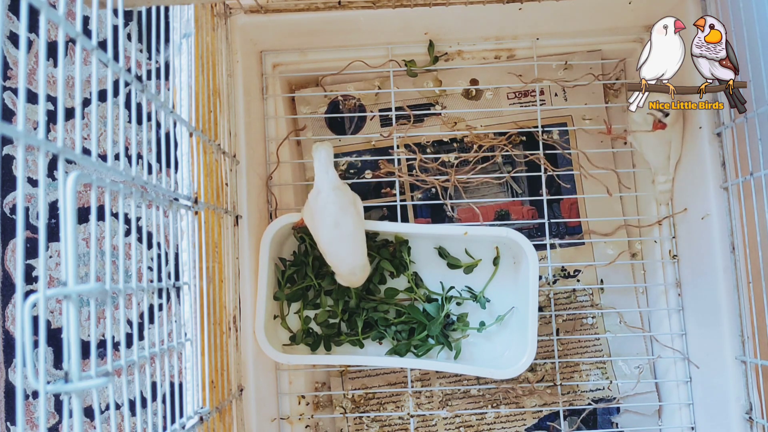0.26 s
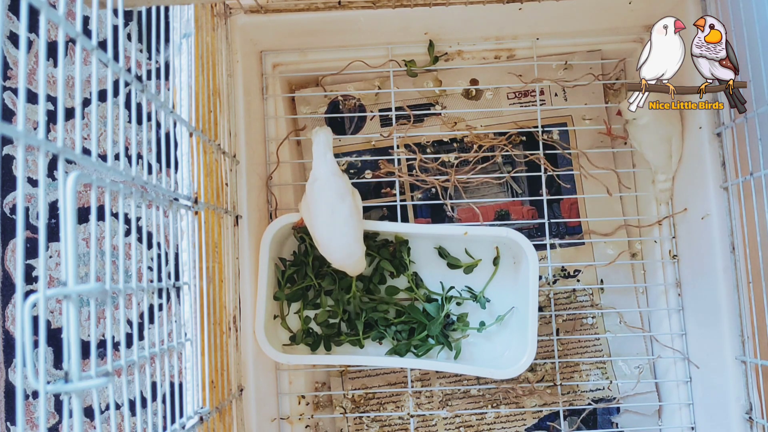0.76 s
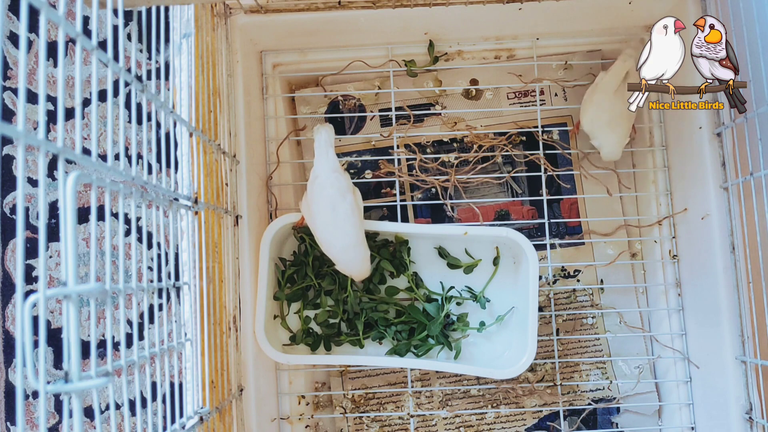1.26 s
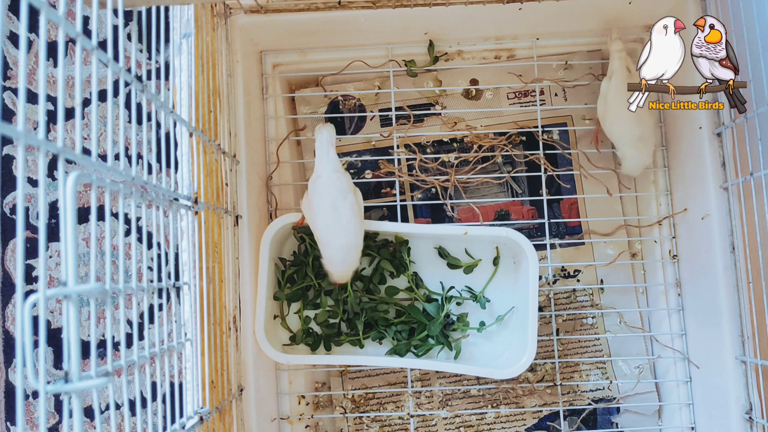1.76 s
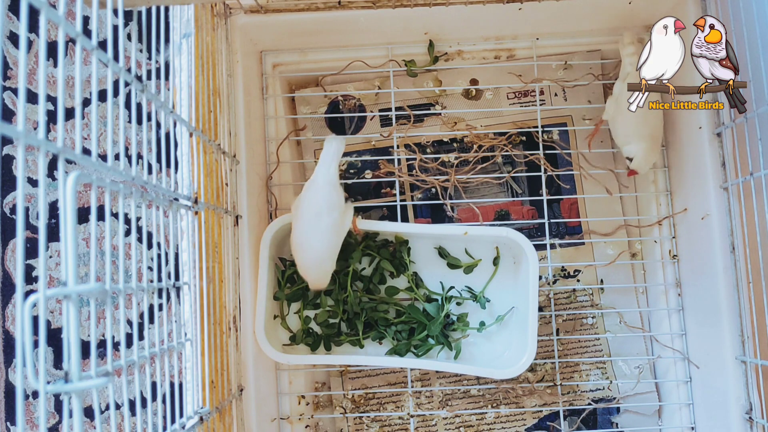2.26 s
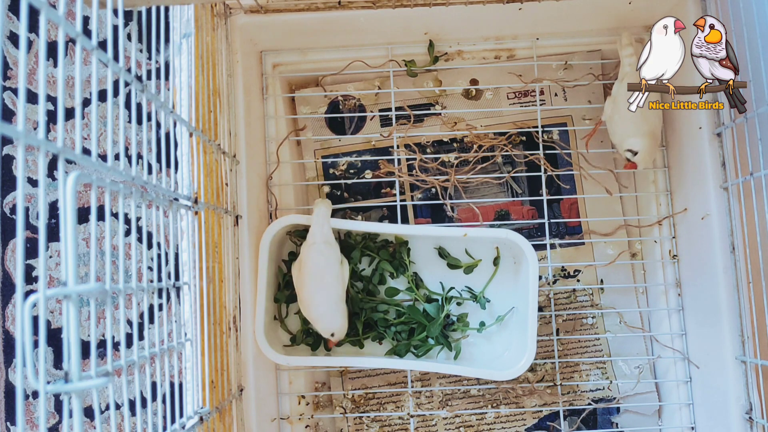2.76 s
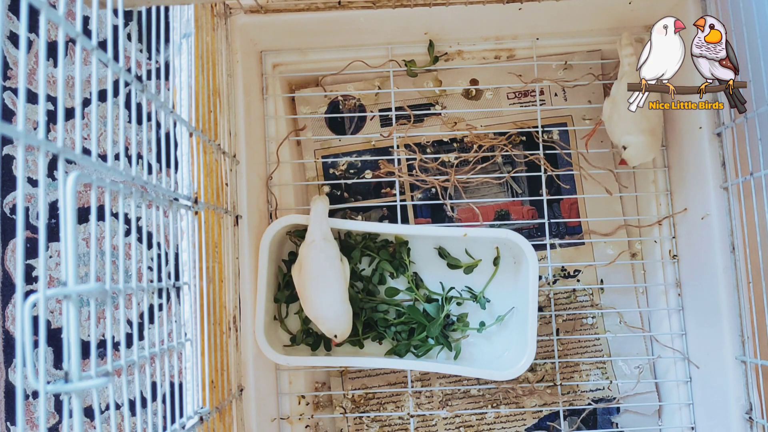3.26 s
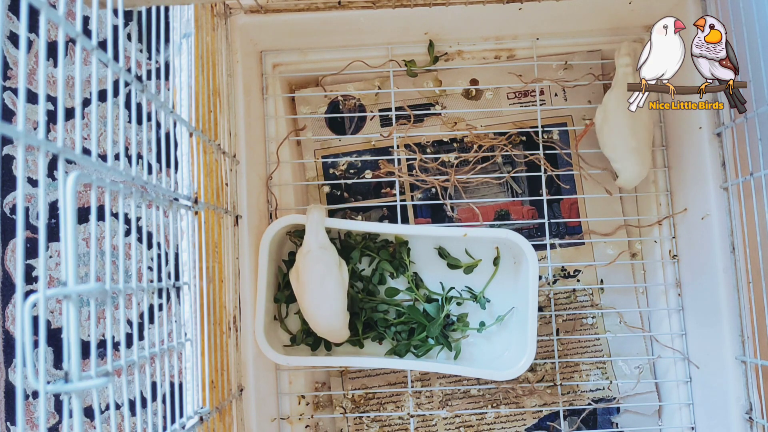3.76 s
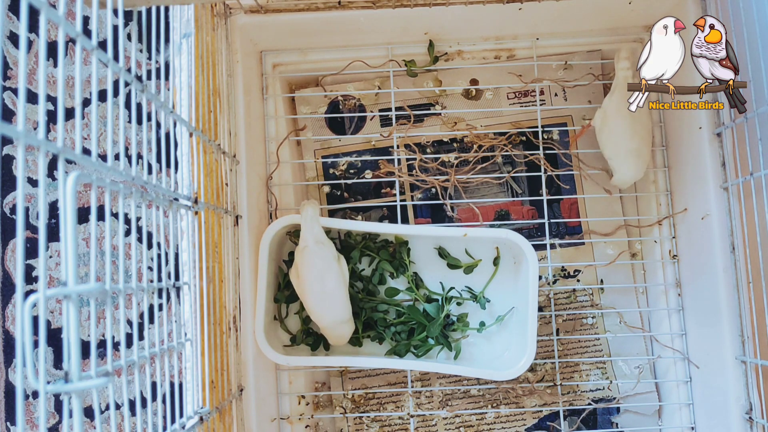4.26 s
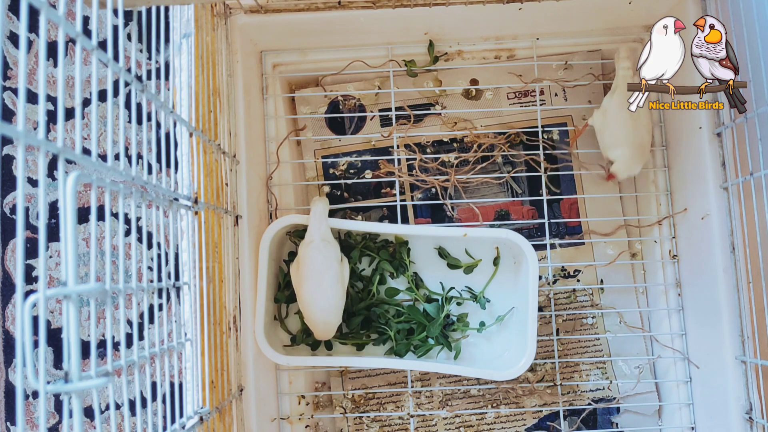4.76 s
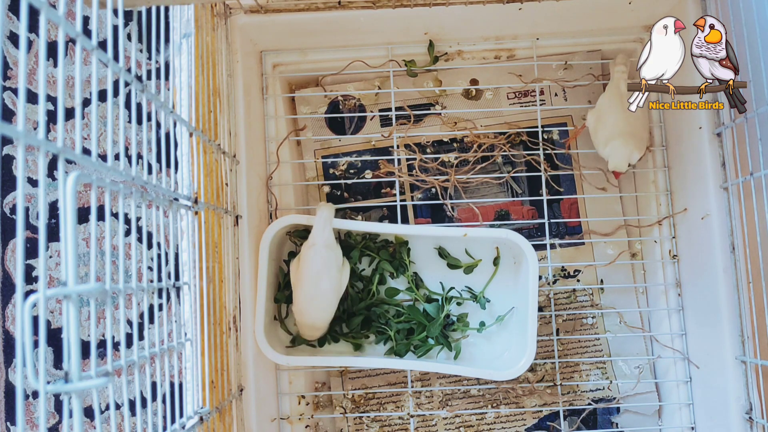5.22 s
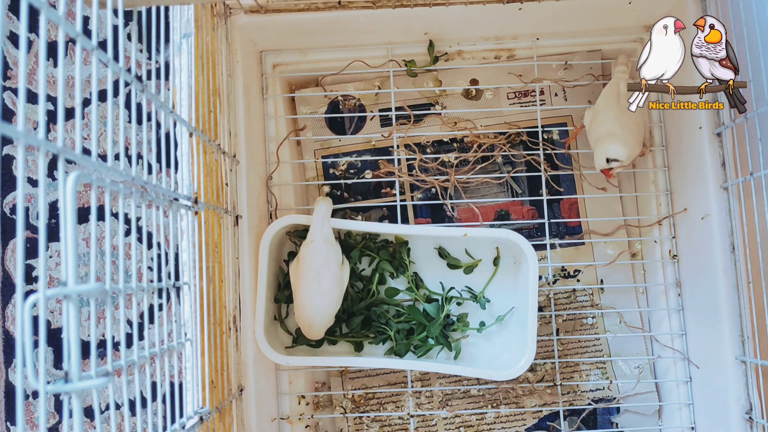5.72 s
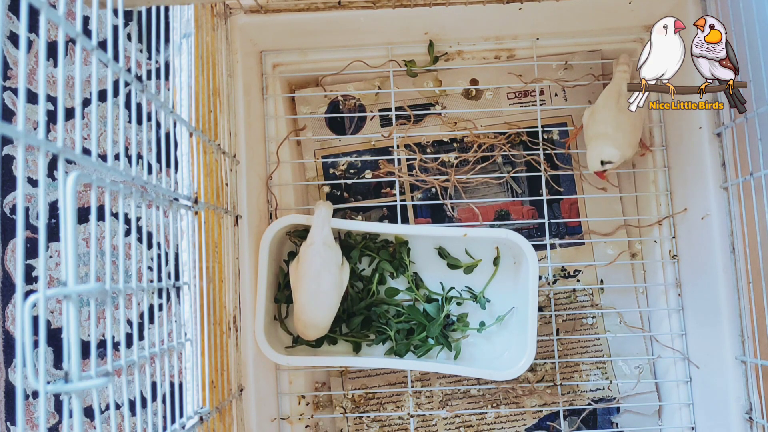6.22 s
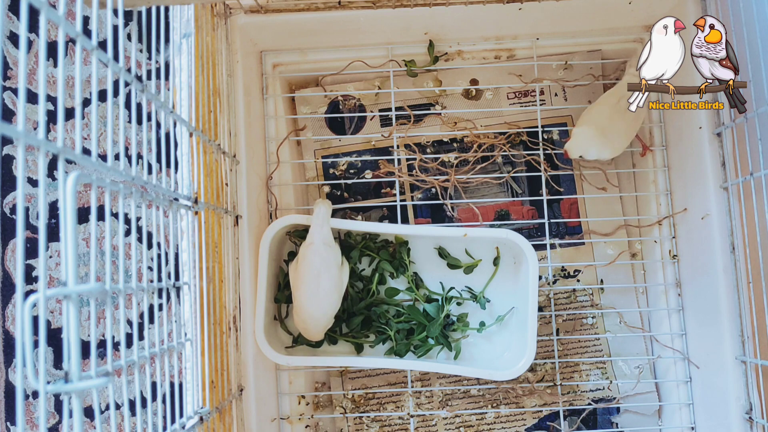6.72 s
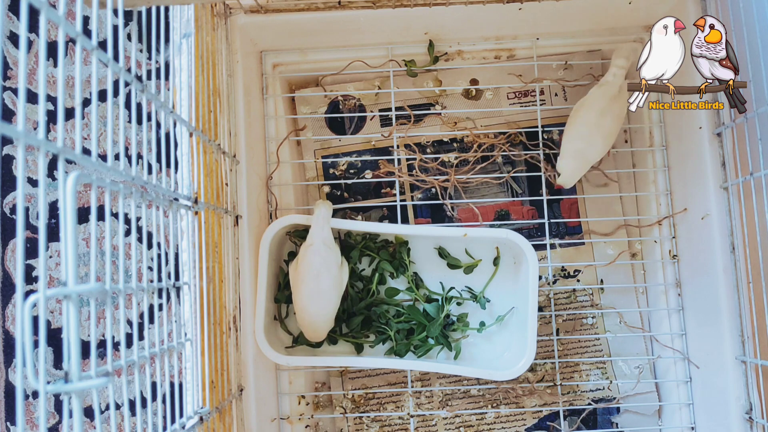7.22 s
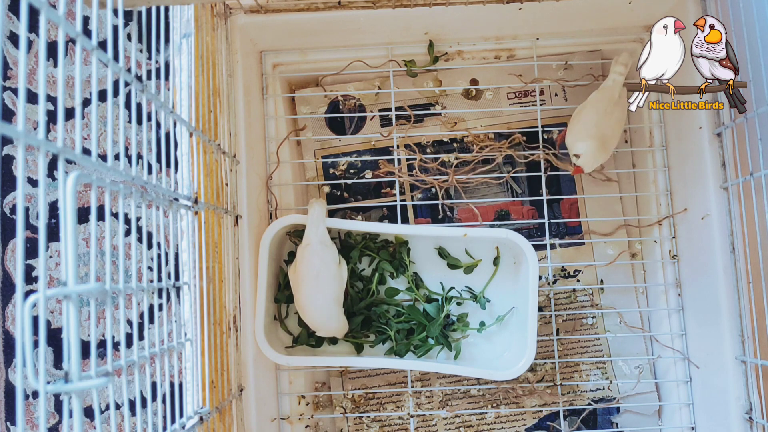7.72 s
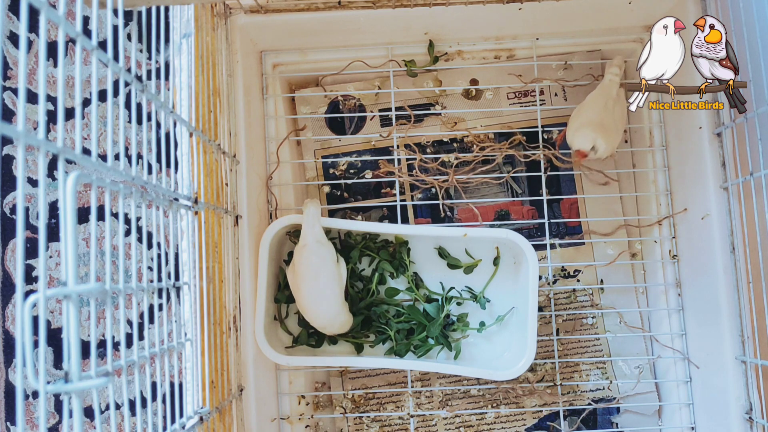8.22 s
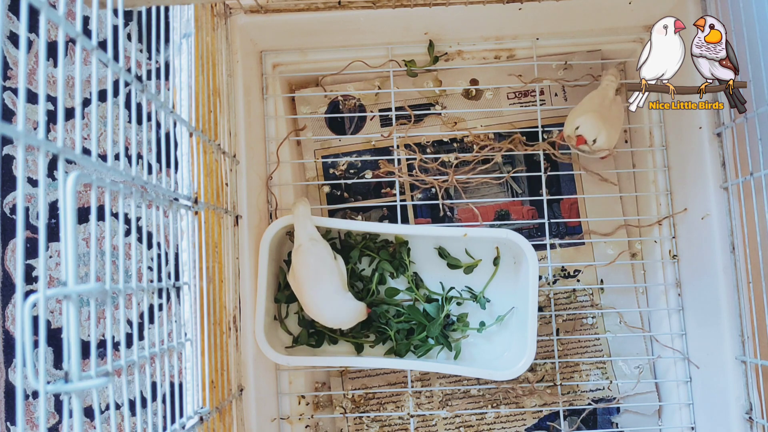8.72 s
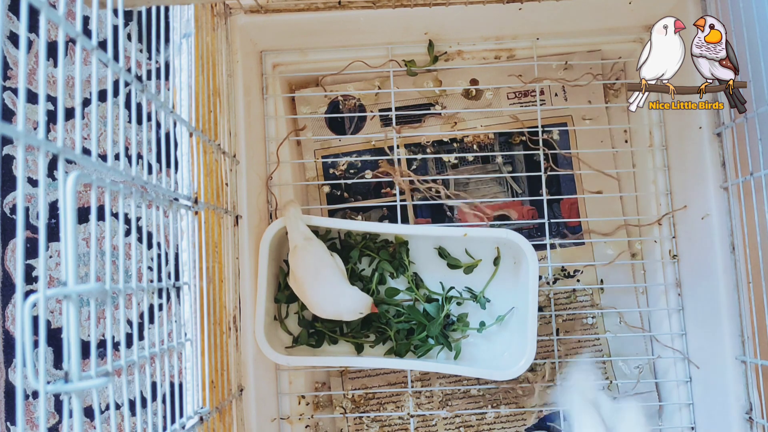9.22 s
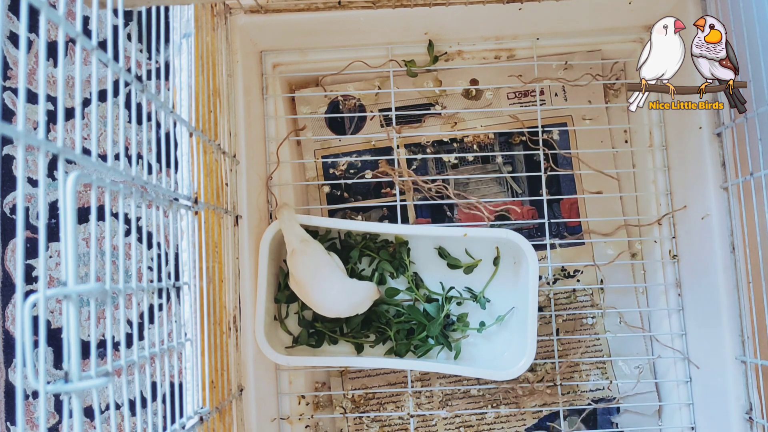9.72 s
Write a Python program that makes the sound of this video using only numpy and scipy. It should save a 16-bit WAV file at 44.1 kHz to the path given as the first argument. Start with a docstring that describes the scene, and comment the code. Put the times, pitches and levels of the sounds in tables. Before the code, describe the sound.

Two small finches move about an indoor wire cage, heard from close by over a low room hum. Brief nasal song with thin whistled pips and soft answering beeps opens and closes the scene. In between, light pecks and hops sound on a tray, broken by two bursts of piercing, upward chirps, the loudest sounds. Wings whirr briefly early on and twice at the end, when the wire clicks and rings faintly.

```python
"""Small room, just above a wire-fronted breeding box of zebra finches. One sings a short phrase four
times: nasal notes, two pure pips, a run of harsh downsweeps. Another answers with soft tets. Notes,
sweeps and tets are syrinx harmonics shaped by the throat; loud rising calls, in two bursts, use both
sides of the syrinx at once. Beaks and feet ring the tray and tick on wire, wings whirr, the room hums."""
import sys
import numpy as np
from scipy import signal
from scipy.fft import rfft, irfft, next_fast_len
from scipy.io import wavfile

SR = 44100
rng = np.random.default_rng(int(sys.argv[2]) if len(sys.argv) > 2 else 0)


def inscribe(sig):
    """Save sig as 16-bit PCM at rate SR to the path in sys.argv[1].

    A 1-D sig is mono; a 2-D sig holds one channel per row.
    Samples are clipped to [-1, 1] before scaling.
    """
    pcm = np.round(np.clip(np.atleast_2d(sig).T, -1, 1) * 32767)
    wavfile.write(sys.argv[1], SR, pcm.astype(np.int16))


N = 440109
TIME_S = np.arange(N) / SR
EDGE_HZ = 15950

# nasal song notes (time [s], length [s], start pitch [Hz], held pitch [Hz], level [dB], roughness [0-1])
NOTES = [(-.035, 0.058, 990, 1090, -24.5, 0.38), (.566, .067, 1344, 1082, -27.5, 0.6),
         (.738, 0.072, 993, 1101, -25, 0.28), (8.235, 0.076, 1012, 1136, -27, 0.28),
         (8.432, .08, 968, 1088, -25, 0.28), (9.081, 0.065, 1332, 1064, -28, 0.48),
         (9.402, 0.067, 987, 1097, -24, 0.25)]
# phrase endings (time [s], low pip [Hz], its level [dB], wait [s], high pip length [s],
# its pitch [Hz], its level [dB])
FLOURISHES = [(0.104, 4106, -27, 0.061, 0.016, 5410, -22), (0.973, 4040, -28, 0.059, 0.025, 5340, -21),
              (8.615, 4214, -28, .063, 0.0125, 5190, -19.5), (9.583, 4070, -26, 0.066, 0.01, 5230, -16.5)]
# downsweep run (delay from high pip onset [s], length [s], from [Hz], to [Hz], level [dB])
SWEEP_RUN = [(0.036, 0.036, 1736, 1180, -37.5), (0.076, .068, 1192, 820, -37.5),
             (0.183, .028, 1860, 1310, -34.5), (0.205, 0.055, 1350, 937, -45)]
# answering calls (time [s], length [s], pitch [Hz], level [dB], roughness [0-1])
TETS = [(0.446, 0.079, 527, -37.5, 0.22), (2.158, .039, 553, -40.5, 0.42), (8.074, 0.096, 629.6, -37, 0.14),
        (8.647, 0.07, 609, -34, 0.1), (8.969, .068, 522, -37.5, 0.2), (9.044, .035, 563, -36, 0.2),
        (9.267, 0.093, 622, -34, 0.13), (9.566, .036, 564, -32, 0.22)]
# low falling calls (time [s], length [s], level [dB])
MURMURS = [(5.01, .052, -35.5), (7.842, 0.043, -36.5)]
# faint contact chips (time [s], level [dB])
CHIPS = [(2.687, -46), (3.815, -50.5), (6.159, -50), (6.48, -54.5), (7.334, -45.5)]
# throat response per call type (frequency [Hz], gain [dB])
NOTE_THROAT = [(500, -16), (1050, -9), (1600, -6), (2200, -4.5), (3300, 3), (4300, 3), (5400, 5),
               (6500, -6.5), (8400, -5.5), (10500, -21.5), (13000, -24), (16000, -16)]
SWEEP_THROAT = [(600, -4), (1500, -6), (2900, 1.5), (4200, 4.5), (5600, 2.5), (7000, -3.5), (8600, -11),
                (10500, -27), (16000, -21)]
TET_THROAT = [(550, -19), (1150, -6), (1800, -9), (2500, -2), (3200, -3.5), (4300, -2.5), (5500, -12),
              (7000, -20.5), (8500, -13), (10500, -41), (16000, -30)]
CHIP_THROAT = [(1400, -16.5), (2900, 5), (4300, -7.5), (6000, -5.5), (9000, -10.5), (16000, -32)]
# loud rising calls (time [s], length [s], pitch at foot of climb [Hz], level [dB])
CRIES = [(3.138, 0.077, 5180, -14), (3.282, 0.057, 5220, -13), (6.698, 0.069, 5130, -12.5),
         (6.827, 0.066, 5120, -11.5), (6.962, 0.063, 4910, -11)]
# their partials (low voice multiple, high voice multiple)
CRY_PARTIALS = [(0, 1), (1, 0), (2, 0), (1, 1), (0, 2), (-1, 1), (-1, 2)]
# per partial (level [dB])
CRY_PARTIALS_DB = [-13, -17.5, -29, -30, -30, -44.5, -24.5]

# short flights and winged hops (time [s], length [s], swish [dB], draught [dB])
FLIGHTS = [(1.084, 0.15, -40.5, -60), (1.435, 0.12, -50, -40), (9.052, 0.14, -39, -36.5),
           (9.813, 0.14, -40.5, -35)]
# claws and beaks on wire (time [s], level [dB])
TICKS = [(1.1206, -33), (1.232, -46), (1.896, -32), (2.052, -38), (3.999, -34.5), (4.741, -35),
         (5.167, -35.5), (5.371, -38.5), (5.931, -42.5), (7.5713, -32.5), (9.0658, -21.5), (9.218, -28),
         (9.866, -20.5), (9.8795, -19.5)]
# pecks and hops on tray and floor (time [s], blow [dB], scuff [dB], centre [Hz])
KNOCKS = [(1.145, -33, -49, 836), (1.231, -31, -40.5, 1074), (1.809, -38, -40, 667),
          (1.901, -32, -40.5, 1120), (2.053, -37, -40, 730), (2.411, -21, -38, 1150),
          (2.425, -32, -51, 1190), (2.44, -25.5, -54, 1190), (2.606, -32, -42, 1020),
          (2.615, -23.5, -65, 1110), (3.696, -34, -37, 1900), (4.247, -45, -60, 1200),
          (4.395, -42, -57, 1100), (4.432, -44, -59, 1080), (4.741, -39, -35, 576),
          (5.228, -48, -52.5, 1600), (5.3, -38, -56, 1580), (6.947, -39, -44, 1040),
          (7.081, -35, -31, 1210), (9.882, -24.5, -61, 760)]
# tray and cage wire modes (frequency [Hz], level [dB], t60 [s])
TRAY_MODES = [(537, -9, 0.063), (782, -6, 0.024), (1005, 0, 0.017), (1153, 0.5, 0.011), (1260, -3.5, 0.034),
              (1514, -0.5, 0.015), (1736, -5, 0.018), (3070, -10.5, 0.021)]
WIRE_MODES = [(2015, -35.5, 0.73), (2173, -38.5, 0.43), (1226, -36, 0.18)]
# noise spectra of feathers, ticks and room air (frequency [Hz], relative level [dB])
FEATHER_SPECTRUM = [(100, 11.5), (250, 4.5), (600, 3.5), (1200, -4.5), (2200, -11), (4500, -10.5),
                    (8500, -7.5), (11000, -22), (16000, -10)]
TICK_SPECTRUM = [(500, -7), (2000, -3.5), (4500, -2.5), (7500, -4), (9000, -3.5), (11000, -27.5),
                 (16000, -8)]
AIR_SPECTRUM = [(12, -27), (20, 4.5), (70, -9.5), (141, -11), (203, -13), (227, -14.5), (496, -15),
                (620, -18.5), (713, -19), (1430, -29.5), (2720, -33.5), (4370, -37), (8310, -40.5),
                (10100, -49), (15800, -38.5)]

# room hum (frequency [Hz], level [dB])
HUM = [(101, -63), (145.3, -64.5), (199.2, -62)]
# left-right likeness of room noise (frequency [Hz], coherence [0-1])
AIR_COHERENCE = [(180, 0.41), (550, 0.53), (1650, 0.083), (4970, 0.02)]
# near-wall reflections (delay [ms], relative gain)
WALLS = [(4.1, .15), (7.2, .2), (10.5, .3), (13, .3), (17, .25), (21, .25), (28, .2)]
# room decay (frequency [Hz], t60 [s])
ROOM_DECAY = [(200, 0.15), (1200, 0.75), (3000, 0.45), (6000, 0.34), (9000, 0.4), (15000, 0.27)]
# duller right side (frequency [Hz], gain [dB])
RIGHT_SHADE = [(500, -0.5), (5000, -1), (8000, -2), (12000, -6)]


def amp(db):
    """dB to gain."""
    return 10 ** (np.asarray(db) / 20)


def unit_rms(x):
    """Scale to rms 1."""
    return x / np.sqrt(np.mean(x ** 2) + 1e-20)


def curve_at(points, hz):
    """Interpolate over log frequency."""
    points_hz, values = np.transpose(points)
    return np.interp(np.log(hz + 1), np.log(points_hz + 1), values)


def add(mix, at_s, sound):
    """Mix in at at_s, cropped to fit."""
    start = round(at_s * SR)
    sound = sound[max(-start, 0):]
    part = mix[max(start, 0):][:len(sound)]
    part += sound[:len(part)]


def equalise(x, spectrum):
    """Filter by (frequency [Hz], gain [dB]) points."""
    size = next_fast_len(len(x), real=True)
    gain = amp(curve_at(spectrum, np.fft.rfftfreq(size, 1 / SR)))
    return irfft(rfft(x, size) * gain, size)[:len(x)]


def noise(spectrum):
    """Scene-long shaped noise, rms 1."""
    return unit_rms(equalise(rng.standard_normal(N), spectrum))


def waver(t, rate_hz):
    """Random line, rms near 1, rate_hz knots a second."""
    knots = rng.standard_normal(4096)
    return np.interp(t * rate_hz, np.arange(len(knots)), knots)


def ramp(t, span_s):
    """0 to 1 over span_s, then held."""
    return np.clip(t / span_s, 0, 1)


def gate(t, attack_s, release_s):
    """Linear attack, hold, release."""
    return ramp(t, attack_s) * ramp(t[-1] - t, release_s)


def syrinx(hz, throat, rough, jitter=0.067, uneven=0.93):
    """Harmonics through the throat; roughness adds jitter and half-pitch lines from uneven pulses."""
    t = np.arange(len(hz)) / SR
    cycles = np.cumsum(hz * (1 + jitter * rough * waver(t, 1475))) / SR
    multiples = np.arange(1, int(2 * EDGE_HZ / hz.min()) + 1)[:, None] / 2
    gains = amp(curve_at(throat, multiples * hz)) * (multiples * hz < SR / 2)
    gains *= np.where(multiples % 1 > 0, uneven * rough, 1)
    lag_cycles = rng.random(size=256)[:len(multiples), None]  # throat ringing spreads each pulse
    stack = (gains * np.sin(2 * np.pi * (multiples * cycles + lag_cycles))).sum(0)
    return unit_rms(stack * (1 + rough * waver(t, 900)))


def nasal_notes(settle_s=0.0088, swell_s=0.0091, fall_s=0.033, swell_db=6, ease_db=3):
    """Harmonic stacks slide onto a held pitch and swell, then drop off it, ending rough."""
    out = np.zeros(N)
    for at_s, length_s, start_hz, held_hz, db, rough in NOTES:
        t = np.arange(0, length_s, 1 / SR)
        fall = ramp(t - length_s + fall_s, fall_s)
        hz = (held_hz + (start_hz - held_hz) * np.exp(-t / settle_s)) * (1 - 0.37 * fall)
        voice = syrinx(hz, NOTE_THROAT, rough=rough + (0.37 - rough) * fall)
        effort_db = db - swell_db * (1 - ramp(t, swell_s)) - ease_db * fall
        add(out, at_s, amp(effort_db) * gate(t, attack_s=0.0034, release_s=0.0017) * voice)
    return out


def room_tone(air_db=-49):
    """Steady stereo air noise, partly coherent in the bass, plus wavering hum."""
    hz, coherence = np.transpose(AIR_COHERENCE)
    left, independent = noise(AIR_SPECTRUM), noise(AIR_SPECTRUM)
    right = equalise(left, np.c_[hz, 20 * np.log10(coherence)])
    right += equalise(independent, np.c_[hz, 10 * np.log10(1 - coherence ** 2)])
    hum = np.zeros(N)
    for hum_hz, db in HUM:
        tone = np.sin(2 * np.pi * hum_hz * TIME_S + 0.82 * waver(TIME_S, 7.5))
        hum += amp(db) * unit_rms(tone * (1 + 0.55 * waver(TIME_S, 6)))
    return np.array([left, right]) * amp(air_db) + hum


def pip(length_s, hz, climb_hz_per_s, flick, fade_s, attack_s, settle_s=0.0025, octave_db=-38):
    """Near-pure whistle: drops onto its pitch, climbs, flicks up as it fades."""
    t = np.arange(0, length_s + fade_s, 1 / SR)
    fade = ramp(t - length_s, fade_s)
    bend = 1 + 0.074 * np.exp(-t / settle_s) + flick * fade + 0.018 * waver(t, 1340)
    phase = 2 * np.pi * np.cumsum(hz * bend + climb_hz_per_s * t) / SR
    tone = unit_rms(np.sin(phase) + amp(octave_db) * np.sin(2 * phase))
    return ramp(t, attack_s) * (1 - fade) ** 4 * tone


def downsweep(length_s, from_hz, to_hz, throat, rough, attack_s, release_s=0.005):
    """Harmonic stack gliding steadily down."""
    t = np.arange(0, length_s, 1 / SR)
    return gate(t, attack_s, release_s) * syrinx(np.geomspace(from_hz, to_hz, len(t)), throat, rough)


def flourishes(low_length_s=0.014):
    """Phrase ending: low pip, high pip, run of harsh downsweeps."""
    pips, runs = np.zeros(N), np.zeros(N)
    for at_s, low_hz, low_db, wait_s, high_length_s, high_hz, high_db in FLOURISHES:
        low = pip(low_length_s, low_hz, climb_hz_per_s=1700, flick=0.033, fade_s=0.0034, attack_s=0.0023)
        high = pip(high_length_s, high_hz, climb_hz_per_s=13600, flick=0.52, fade_s=0.018,
                   attack_s=0.0022)
        add(pips, at_s, amp(low_db) * low)
        add(pips, at_s + wait_s, amp(high_db) * high)
        for delay_s, length_s, from_hz, to_hz, db in SWEEP_RUN:
            sweep = downsweep(length_s, from_hz, to_hz, SWEEP_THROAT, rough=0.75, attack_s=0.0059)
            add(runs, at_s + wait_s + delay_s, amp(db) * sweep)
    return pips, runs


def tets(scoop=0.22, settle_s=0.012, fall=0.092, fall_s=0.0293):
    """Soft, clear stacks; pitch and level form one low arch."""
    out = np.zeros(N)
    for at_s, length_s, held_hz, db, rough in TETS:
        t = np.arange(0, length_s, 1 / SR)
        hz = held_hz * (1 - scoop * np.exp(-t / settle_s) - fall * ramp(t - length_s + fall_s, fall_s))
        envelope = amp(db) * gate(t, attack_s=0.024, release_s=0.019)
        add(out, at_s, envelope * syrinx(hz, TET_THROAT, rough))
    return out


def wings(beat_hz=26, rise_s=0.045, lag_s=0.052, swish_fade_db_per_s=67, draught_fade_db_per_s=220):
    """Each downstroke swishes the feathers and pushes a puff of air; the draught arrives later."""
    swish_gain, draught_gain = np.zeros(N), np.zeros(N)
    t = np.arange(SR) / SR
    for at_s, length_s, swish_db, draught_db in FLIGHTS:
        landed_s = np.maximum(t - length_s, 0)
        add(swish_gain, at_s, ramp(t, rise_s) * amp(swish_db - swish_fade_db_per_s * landed_s))
        puff = ramp(t - lag_s, rise_s) * amp(draught_db - draught_fade_db_per_s * landed_s)
        add(draught_gain, at_s, puff)
    stroke = np.sin(2 * np.pi * np.cumsum(beat_hz * (1 + 0.094 * waver(TIME_S, 9.2))) / SR)
    eddies = noise([(20, 4), (90, -8.5), (200, -14), (600, -54), (3000, -80)])
    feathers = (1 + 0.17 * stroke) * amp(5.85 * waver(TIME_S, 350)) * noise(FEATHER_SPECTRUM)
    return swish_gain * unit_rms(feathers), draught_gain * unit_rms(0.6 * stroke + eddies)


def ticks(trim_db=-5, rise_s=0.00034, t60_s=0.039, nibble_db=-58, nibbles_per_s=9):
    """Brief scrapes on wire, plus faint random nibbling of seed and greens."""
    t = np.arange(SR // 15) / SR
    nibble_gain = amp(nibble_db + 3 * np.minimum(rng.exponential(1, N), 3))
    impulses = nibble_gain * (rng.random(N) < nibbles_per_s / SR)
    for at_s, db in TICKS:
        add(impulses, at_s, amp([db + trim_db]))
    envelope = amp(-60 * t / t60_s) * (1 - np.exp(-t / rise_s))
    return signal.oaconvolve(impulses, envelope)[:N] * noise(TICK_SPECTRUM)


def tray_knocks(focus_db_per_octave=12, contact_s=0.00018, scuff_rise_s=0.0072, scuff_t60_s=0.2):
    """Each blow rings the tray modes near its centre frequency; scuffing feet prolong them."""
    out, t = np.zeros(N), np.arange(SR // 5) / SR
    for at_s, blow_db, scuff_db, centre_hz in KNOCKS:
        ring = np.zeros(len(t))
        for hz, db, t60_s in TRAY_MODES:
            mode_db = db - focus_db_per_octave * abs(np.log2(hz / centre_hz))
            ring += amp(mode_db - 60 * t / t60_s) * np.sin(2 * np.pi * hz * rng.uniform(1, 1.04) * t)
        ring *= 1 - np.exp(-t / contact_s)
        scuff = unit_rms(signal.fftconvolve(rng.standard_normal(2 * len(t)), ring, "valid"))[:len(t)]
        scuff *= amp(scuff_db - 60 * t / scuff_t60_s) * (1 - np.exp(-t / scuff_rise_s))
        add(out, at_s, amp(blow_db) * ring / abs(ring).max() + scuff)
    return out


def contact_calls():
    """Quiet downsweeps between phrases: low murmurs, tiny chips."""
    out = np.zeros(N)
    for at_s, length_s, db in MURMURS:
        add(out, at_s, amp(db) * downsweep(length_s, 570, 410, NOTE_THROAT, rough=0.36, attack_s=0.023))
    for at_s, db in CHIPS:
        add(out, at_s, amp(db) * downsweep(0.042, 1500, 1200, CHIP_THROAT, rough=0.65, attack_s=0.0045))
    return out


def rising_cries(climb_hz_per_s=18000, low_ratio=0.628, low_attack_s=0.023, rasp_db=-30):
    """Both sides of the syrinx sweep up and intermodulate in a rasp of air; the low side swells later."""
    scoop_hz, scoop_s, flick_hz, flick_s = 1250, 0.0091, 380, 0.0041
    break_hz, break_width_hz, break_db = 5594, 100, 13  # high voice breaks into a loud whistle
    out, effort = np.zeros(N), np.zeros(N)
    for at_s, length_s, foot_hz, db in CRIES:
        t = np.arange(0, length_s, 1 / SR)
        hz = foot_hz + climb_hz_per_s * t - scoop_hz * np.exp(-t / scoop_s)
        hz += flick_hz * np.exp((t - length_s) / flick_s)
        high_cycles = np.cumsum(hz * (1 + 0.005 * waver(t, 1800))) / SR
        low_cycles = np.cumsum(low_ratio * hz * (1 + 0.029 * waver(t, 1200))) / SR
        whistle, *others = [amp(partial_db) * np.sin(2 * np.pi * (m * low_cycles + n * high_cycles))
                            for (m, n), partial_db in zip(CRY_PARTIALS, CRY_PARTIALS_DB)]
        whistle *= amp(break_db * ramp(hz - break_hz, break_width_hz))
        voice = whistle + ramp(t, low_attack_s) * sum(others)
        swell = amp(db) * gate(t, attack_s=0.013, release_s=0.004)
        flutter = 1 + 0.089 * waver(t, 1500)
        add(out, at_s, np.sqrt(2) * swell * voice * flutter)
        add(effort, at_s, swell)
    rasp = noise([(1500, -16.5), (3200, -2.5), (5000, -14), (7500, -6), (10000, -4.5), (15000, -8)])
    return out + amp(rasp_db) * effort * rasp


def wire_ring(take_off_s=9.085):
    """The grid rings on after a bird pushes off."""
    out, t = np.zeros(N), np.arange(SR) / SR
    for hz, db, t60_s in WIRE_MODES:
        add(out, take_off_s, amp(db - 60 * t / t60_s) * np.sin(2 * np.pi * hz * t))
    return out


def room(x, tail_db, walls_db, right_lag_samples=4, build_s=0.0052):
    """Mono to stereo: direct sound, left first; near-wall slaps; diffuse tail."""
    shape = (2, SR * 3 // 5)
    echoes = rng.standard_normal(shape) * (rng.random(shape) < 0.12)
    hz, t, bands = signal.stft(echoes, SR, nperseg=256)
    envelope = amp(-60 * t / curve_at(ROOM_DECAY, hz)[:, None]) * (1 - np.exp(-t / build_s))
    tail = signal.istft(bands * envelope, SR, nperseg=256)[1]
    response = amp(tail_db) * tail / np.linalg.norm(tail, axis=1, keepdims=True)
    response[[0, 1], [0, right_lag_samples]] += 1  # direct path
    for delay_ms, gain in WALLS:
        for side in response:
            add(side, (delay_ms + rng.uniform(-0.4, 0.37)) / 1000, amp([walls_db]) * gain)
    left, right = signal.oaconvolve(x[None], response, axes=1)[:, :N] / np.linalg.norm(response[0])
    return np.array([left, equalise(right, RIGHT_SHADE)])


def scene():
    """Birds, cage and room; all louder on the left."""
    swish, draught = wings()
    pips, runs = flourishes()
    cries = room(rising_cries(), tail_db=-3, walls_db=-3.5, right_lag_samples=2)
    whistles = room(pips, tail_db=-3, walls_db=-1, right_lag_samples=3)
    song = room(nasal_notes() + runs + contact_calls(), tail_db=-1, walls_db=-1)
    answers = room(tets(), tail_db=-3, walls_db=0)
    tray = room(tray_knocks(), tail_db=-9.5, walls_db=-14)
    grid = room(ticks() + wire_ring() + swish, tail_db=-3.5, walls_db=-5.5)
    return (cries * amp([[1.5], [-4.5]])  # (left [dB], right [dB])
            + whistles * amp([[4.5], [-3.5]])
            + (song + answers) * amp([[2], [-3.5]])
            + (tray + grid) * amp([[4], [-2]])
            + (room_tone() + draught) * amp([[2.5], [-3.5]]))


def record(dry):
    """Low-pass at EDGE_HZ."""
    lowpass = signal.firwin(511, EDGE_HZ, window=("kaiser", 9), fs=SR)
    return signal.oaconvolve(dry, lowpass[None], "same")


dry = scene()
out = record(dry)
inscribe(out)
```